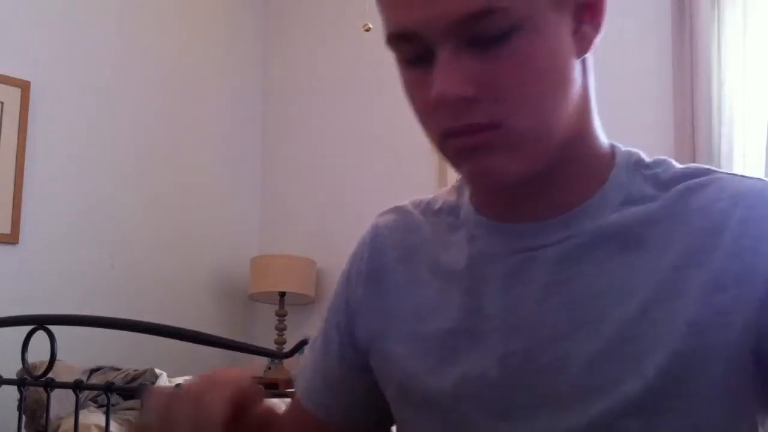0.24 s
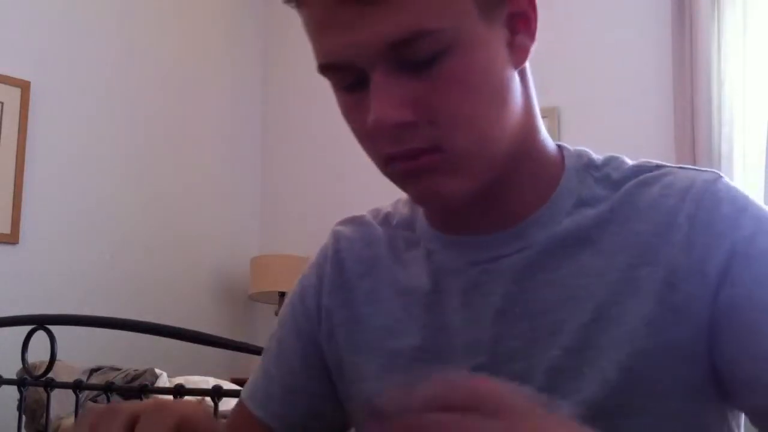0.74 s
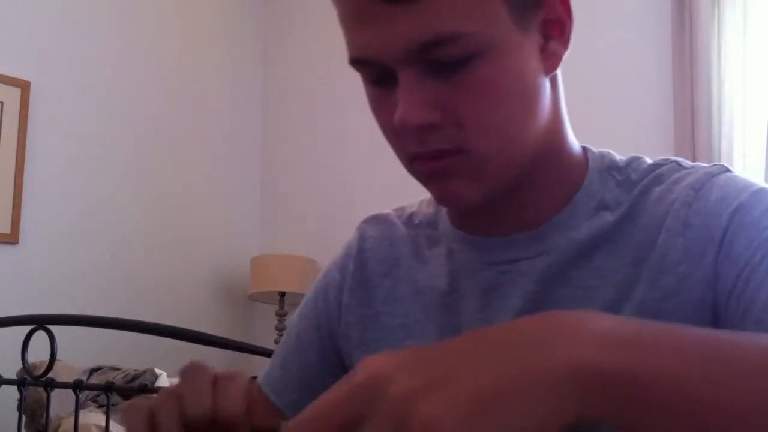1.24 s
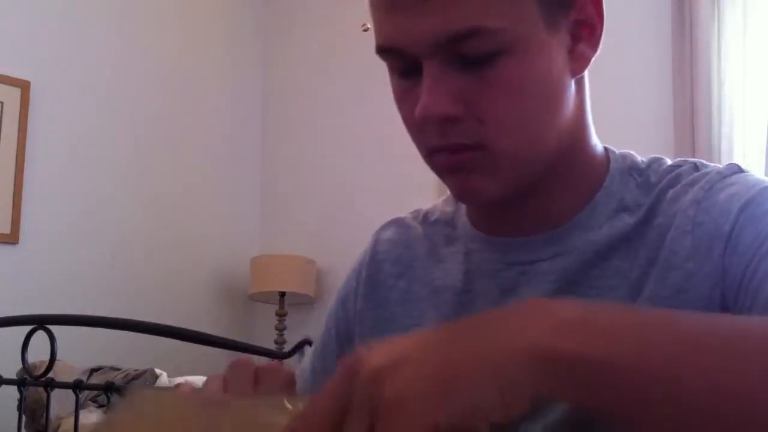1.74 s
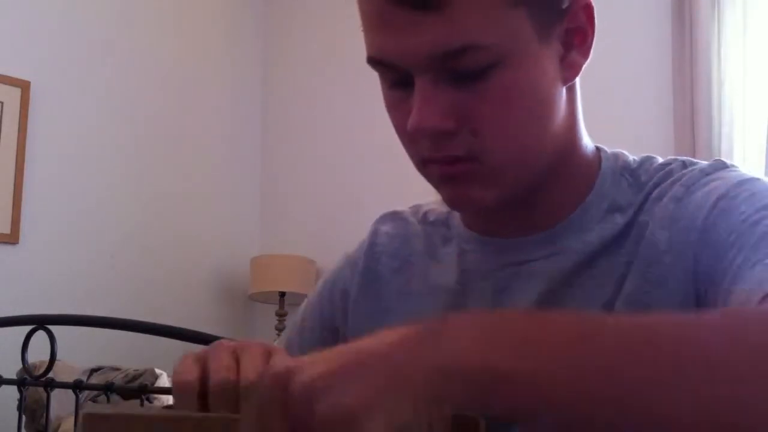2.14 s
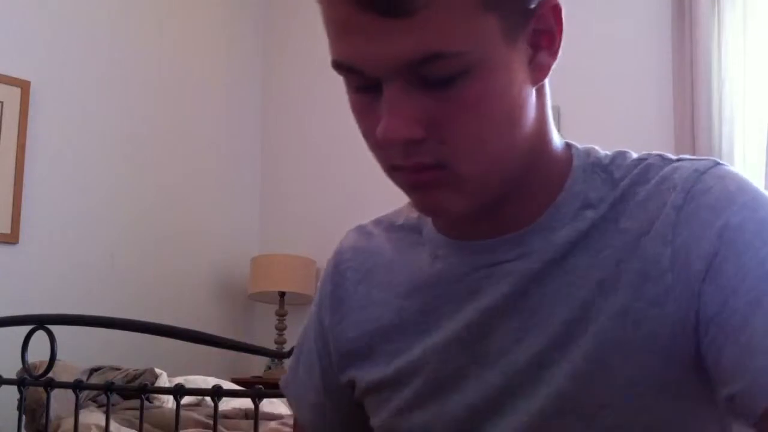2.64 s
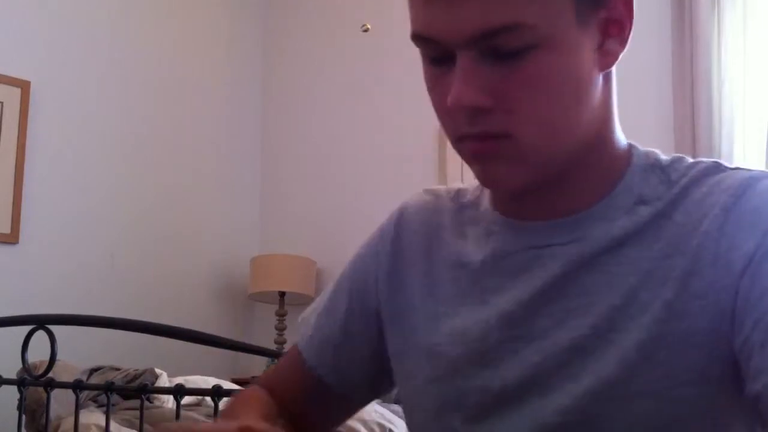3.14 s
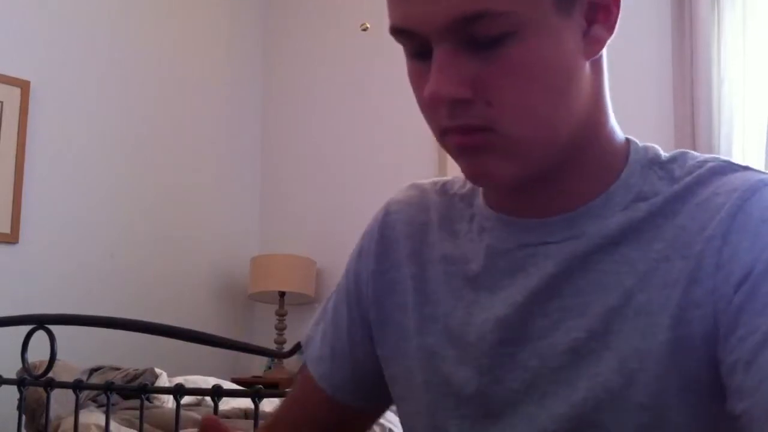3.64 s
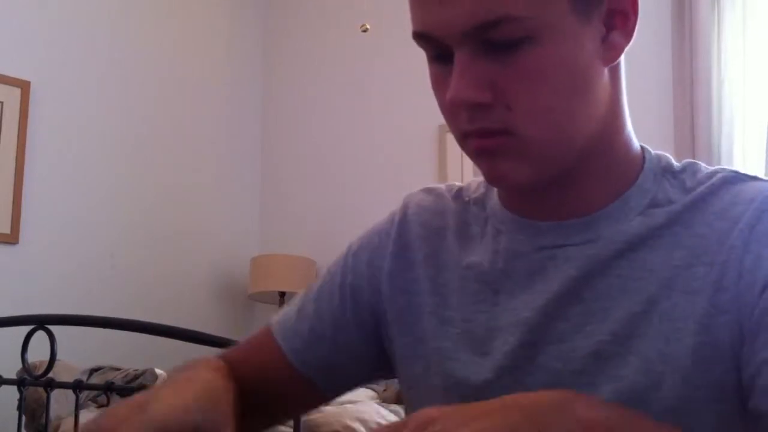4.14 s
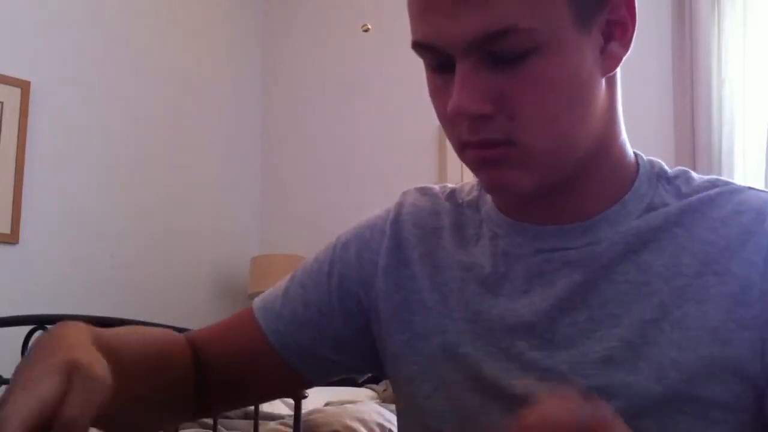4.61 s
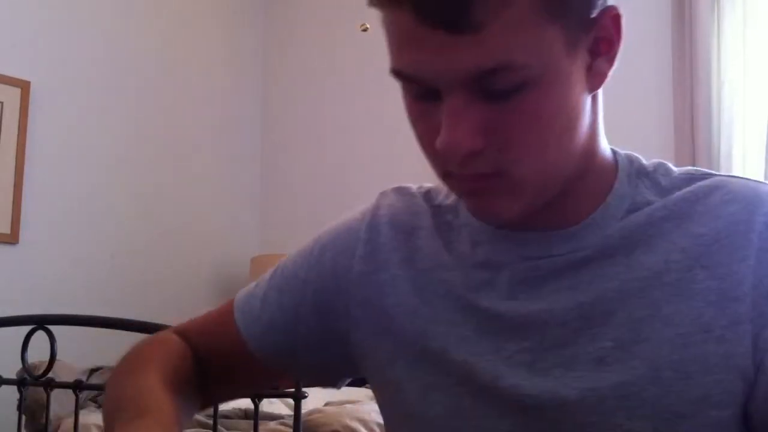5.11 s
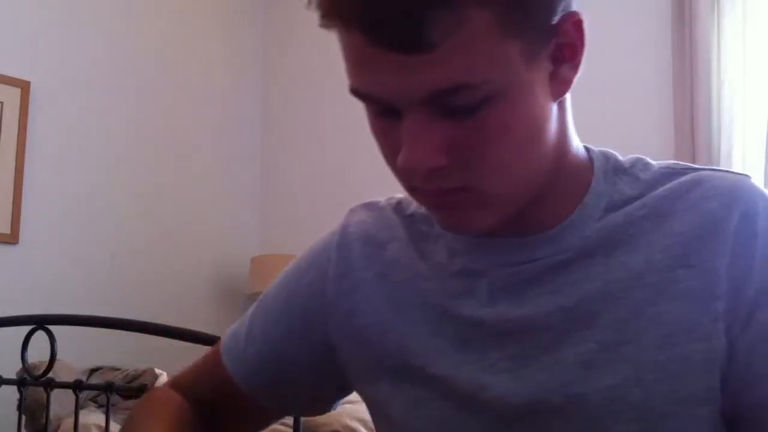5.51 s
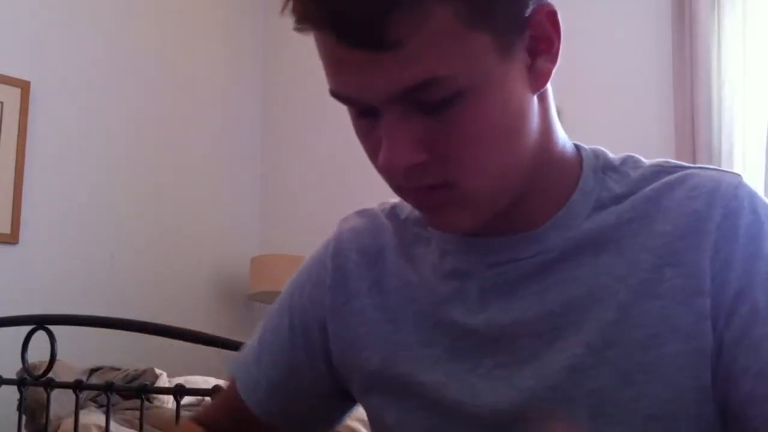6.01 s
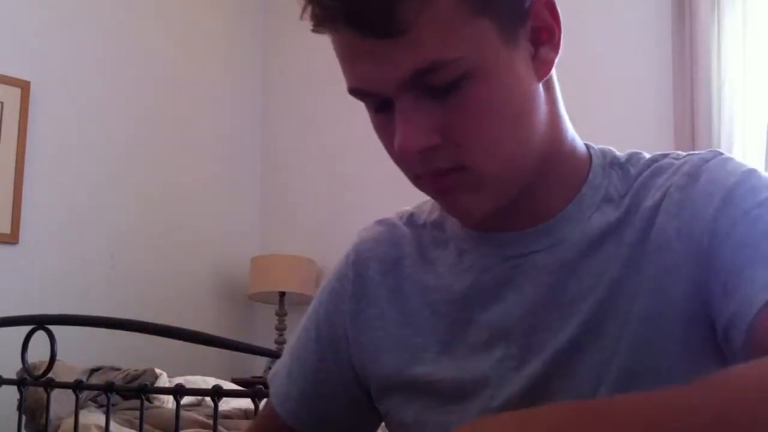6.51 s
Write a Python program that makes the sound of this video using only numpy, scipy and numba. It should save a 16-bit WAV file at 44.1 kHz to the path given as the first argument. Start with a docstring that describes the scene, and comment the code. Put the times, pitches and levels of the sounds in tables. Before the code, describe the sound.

Low room noise with a soft fan-like hum. A small metal tool clinks, then something hard snaps down twice, briefly ringing the desktop. Afterwards, much quieter plastic wrapping rustles and crackles in irregular flurries, with dry clicks, little scrapes and dull box thumps, sparser in the middle and busier towards the end. Close, slightly thin laptop microphone sound with a short, soft bedroom echo.

```python
"""Low room noise and a hum, faint ticks of plastic, a metal clink, then something hard snaps down twice on a desk.
Hands then open a plastic-wrapped box in a small bedroom, close to a laptop microphone: the wrapping rasps, hisses
(stick-slip clicks), ticks (resonant noise bursts) and crackles (dense flips); the box bumps (decaying sines) and drags.
Snaps are noise cracks plus desk modes, the clink is high modes, the room is a decaying noise echo."""
import sys
import numpy as np
from scipy import signal
from scipy.fft import rfft, irfft
from scipy.io import wavfile
from scipy.ndimage import uniform_filter1d
from numba import njit

SR = 44100
rng = np.random.default_rng(int(sys.argv[2]) if len(sys.argv) > 2 else 0)


def master(y):
    """Save y as 16-bit WAV."""
    cut = np.clip(np.atleast_2d(y).T, -1, 1)
    pcm = np.round(cut * 32767)  # scale
    wavfile.write(sys.argv[1], SR, pcm.astype(np.int16))


N = 298116
TIME = np.arange(N) / SR
RING = TIME[:SR // 2]  # time axis of one blow, s


def undb(db):
    """Decibels to gain."""
    return 10 ** (np.asarray(db) / 20)


def unit(x):
    """Scale to rms 1."""
    return x / np.sqrt(np.mean(x ** 2))


def hit_level(x, db, size=220):
    """Scale a blow so that the rms of its first samples has the given level."""
    return x * undb(db) / np.sqrt(np.mean(x[:size] ** 2))


def add(track, start_s, x):
    """Mix a sound into a track at a time."""
    i = max(int(start_s * SR), 0)
    track[i:i + len(x)] += x[:max(N - i, 0)]


def on_log_axis(hz, points):
    """Read (Hz, value) points on a log-frequency axis."""
    point_hz, value = np.transpose(points)
    return np.interp(np.log(hz + 1), np.log(point_hz), value)


def colour(x, points, extra_db=lambda hz: 0, size=4096):
    """Causal minimum-phase filter with the given spectrum plus an extra curve in dB."""
    hz = np.fft.rfftfreq(size, 1 / SR) + 1
    cepstrum = irfft(np.log(undb(on_log_axis(hz, points) + extra_db(hz))))
    # fold the cepstrum onto positive time
    cepstrum[1:size // 2] *= 2
    cepstrum[size // 2 + 1:] = 0
    response = irfft(np.exp(rfft(cepstrum)))
    return signal.fftconvolve(x, response)[:len(x)]


def fade(t60_s):
    """Exponential decay by 60 dB in t60_s."""
    return np.exp(-np.log(1000) * RING / max(t60_s, 1 / SR))


def ring(modes):
    """Sum of damped modes, each starting at a random phase."""
    return sum(undb(db) * fade(t60_s) * np.sin(2 * np.pi * (hz * RING + rng.random()))
               for hz, db, t60_s in modes)


def crack(t60_s, edge):
    """One sharp contact, then a fading noise chatter of tiny ones."""
    x = rng.standard_normal(len(RING)) * fade(t60_s)
    x[0] += edge
    return x


def walk(rate_hz):
    """Smooth random wandering, rms 1."""
    step = max(int(SR / rate_hz), 2)
    levels = np.repeat(rng.standard_normal(N // step + 1), step)
    return unit(uniform_filter1d(levels, step)[:N])


def slips(rate_hz, spread_db, flutter_db, flutter_hz):
    """Stick-slip friction: tiny clicks of random size and sign that come in flurries."""
    sizes = undb(spread_db * np.minimum(rng.exponential(size=N), 5))
    clicks = (rng.random(N) < rate_hz / SR) * sizes * rng.choice([-1, 1], N)
    return clicks * undb(flutter_db * walk(flutter_hz))


@njit
def resonance(x, hz, width):
    """State-variable band-pass with a moving centre and a width relative to it."""
    y, band, low = np.empty(len(x)), 0., 0.
    for i in range(len(x)):
        g = np.tan(np.pi * hz[i] / SR)
        v = (band + g * (x[i] - low)) / (1 + g * (g + width))
        band, low, y[i] = 2 * v - band, low + 2 * g * v, width * v
    return y


def patch(hz, patch_hz, treble_db, peak_db, octaves, treble_hz=4500):
    """Response in dB of a flexing patch of plastic: one resonance and a treble shelf."""
    peak = peak_db / (1 + (np.log2(hz / patch_hz) / octaves) ** 2)
    shelf = treble_db / (1 + (treble_hz / hz) ** 4)
    return peak + shelf


RUB_RISE_SHARE, RUB_ROUNDNESS = 0.59, 1.05  # share spent speeding up; 1 = pointed, 2 = bell-shaped


def rub(peak_s, length_s):
    """A finger speeds up, then slows a little more quickly; length_s lies between the 1/e points."""
    rise = np.clip(RUB_RISE_SHARE, .1, .9)
    away = np.where(TIME < peak_s, (peak_s - TIME) / rise, (TIME - peak_s) / (1 - rise)) / length_s
    return np.exp(-np.minimum(away, 5) ** RUB_ROUNDNESS)


def stroke(length_s, taper):
    """A movement that starts, holds its speed and stops; taper is the share spent on both ends."""
    return signal.windows.tukey(int(length_s * SR), taper)


# Light rustle, one curve per hold of the wrapping. Each row: time in seconds, level in dB before the hold offsets.
HOLD_CURVES = [
    [(0.88, -55), (1.086, -55), (1.192, -57.5), (1.25, -62)],
    [(1.47, -64.5), (1.76, -54.5)],
    [(1.82, -55), (2.31, -54.5), (3.21, -54), (3.33, -61), (4.07, -62.5)],
    [(4.33, -65), (4.81, -54.5), (6.4, -56.5), (6.51, -52), (6.76, -54.5)],
]
# Finger rubs. Each row: fastest moment in seconds, length in seconds, rasp in dB, film hiss over rasp in dB.
RUBS = [(0.98, 0.04, -47, -1), (1.028, 0.073, -49.5, -1.5), (1.209, 0.063, -53, -6),
        (1.363, 0.084, -63.5, -0.5), (1.504, 0.047, -56, 0), (1.671, 0.055, -49.5, 5.5),
        (1.905, .11, -55.5, 6), (1.993, 0.037, -57, 8.5), (2.083, 0.075, -50, -4), (2.142, 0.057, -52, 0),
        (2.226, 0.027, -44.5, -6), (2.255, 0.042, -50.5, 7.5), (2.516, 0.15, -54.5, -3),
        (2.63, 0.078, -48, 0.5), (2.987, 0.041, -48.5, 5.5), (3.077, .07, -47, 2), (3.123, 0.046, -42.5, 3),
        (3.222, 0.076, -53.5, 0.5), (3.318, 0.072, -50, 1.5), (3.825, 0.021, -53, 2),
        (3.966, 0.13, -56.5, 1), (4.041, 0.043, -57, -8.5), (4.456, 0.063, -60, 4), (4.498, 0.062, -56, 1),
        (4.663, 0.13, -53.5, -1), (4.757, 0.068, -50, 5), (4.872, 0.071, -47.5, 3), (4.982, 0.19, -52.5, 3),
        (5.105, 0.046, -60, 9.5), (5.433, 0.15, -56.5, 6.5), (5.522, 0.14, -46.5, -8),
        (5.65, .05, -57.5, 5), (5.852, 0.071, -49.5, -4), (5.99, 0.083, -53, -7), (6.062, 0.21, -53, -2.5),
        (6.155, 0.061, -56, 0), (6.216, 0.039, -61, 8.5), (6.342, 0.0097, -46, 7.5), (6.445, 0.04, -49, 1),
        (6.546, 0.071, -41.5, -2.5), (6.76, 0.078, -45, -3.5)]
# Pushes of the box over the desk. Each row: start in seconds, length in seconds, drag level in dB.
PUSHES = [(0.975, 0.046, -42.5), (1.59, 0.066, -53), (1.84, .08, -52), (2.448, 0.22, -42.5),
          (2.903, .07, -50), (3.036, .19, -49), (3.855, 0.042, -48), (4.473, 0.067, -53.5),
          (4.623, 0.063, -51), (4.82, 0.1, -49.5), (5.015, 0.052, -52), (5.11, 0.34, -51),
          (5.49, .17, -50.5), (5.8, 0.061, -49), (5.972, .15, -51), (6.342, 0.11, -51.5), (6.51, 0.14, -51)]
HOLD_RASP_DB, HOLD_HISS_DB, LET_GO_S = -3, -6.5, 0.048  # LET_GO_S: time to take hold or let go
PUSH_TAPER, DRAG_BELOW_RASP_DB = 0.57, -4.5  # all rubbing and holding also shifts the box a little


def handling():
    """Strength of drag, rasp and hiss over time: holding, rubbing and pushing add up in power."""
    hold = sum(undb(np.interp(TIME, *np.transpose(curve), left=-120, right=-120)) for curve in HOLD_CURVES)
    hold = uniform_filter1d(hold, int(LET_GO_S * SR))
    rasp = (hold * undb(HOLD_RASP_DB)) ** 2
    hiss = (hold * undb(HOLD_HISS_DB)) ** 2
    for peak_s, length_s, db, film_db in RUBS:
        power = (rub(peak_s, length_s) * undb(db)) ** 2
        rasp = rasp + power
        hiss = hiss + power * undb(film_db) ** 2
    drag = rasp * undb(DRAG_BELOW_RASP_DB) ** 2
    for start_s, length_s, db in PUSHES:
        add(drag, start_s, (stroke(length_s, PUSH_TAPER) * undb(db)) ** 2)
    return np.sqrt([drag, rasp, hiss])


# Spectrum of box on desk. Each row: frequency in Hz, relative density in dB.
DRAG_COLOUR = [(50, -23), (100, -24), (160, 0.5), (270, 0.5), (400, -5.5), (580, -5), (800, -24),
               (1500, -16.5), (4000, -58.5)]
# Spectrum of rubbed wrapping. Each row: frequency in Hz, relative density in dB.
RASP_COLOUR = [(300, -26), (600, 6.5), (810, -4), (1000, 2), (1600, -6), (2200, -4.5), (3100, -1),
               (3600, -6.5), (4100, -3.5), (5200, -4.5), (7000, -5), (16000, -47)]
# Spectrum of thin film and light contact. Each row: frequency in Hz, relative density in dB.
HISS_COLOUR = [(1500, -15.5), (4000, -10), (6500, -3), (8500, 1), (10000, 2.5), (12500, 1), (14500, -2.5),
               (16000, -5)]


def sliding(drag_gain, rasp_gain, hiss_gain, rasp_hz=1900, wander_octaves=0.21, rasp_width=0.33, focus_db=-6):
    """Friction in three places: the box drags on the desk, the wrapping rasps, its thin film hisses."""
    drag = unit(colour(slips(1500, 1.7, 4.0, 45), DRAG_COLOUR))
    crinkle = slips(4000, 1.0, 2.0, 70)
    rasp = unit(colour(crinkle, RASP_COLOUR))
    # the stretch of wrapping under the fingers changes, and its resonance with it
    centre_hz = np.clip(rasp_hz * 2 ** (wander_octaves * walk(14)), 600, 6000)
    focus = unit(resonance(rasp, centre_hz, float(rasp_width)))
    rasp = unit(rasp + undb(focus_db) * focus)
    film = unit(crinkle) + unit(slips(16000, 0.6, 2.06, 40))
    hiss = unit(colour(film, HISS_COLOUR))
    return drag * drag_gain + rasp * rasp_gain + hiss * hiss_gain


# Buckling plastic. Each row: start in seconds, level in dB before the box, patch pitch in Hz, treble shelf in dB.
TICKS = [(0.155, -56, 860, -22), (0.245, -58.5, 1000, -10), (0.375, -46, 1103, -29.5),
         (0.405, -43.5, 950, -25), (1.021, -39.5, 2060, 3), (1.168, -36.5, 3040, -8), (1.468, -45, 3130, 6),
         (1.578, -38.5, 1480, -9.5), (2.074, -40, 2720, -8), (2.098, -39.5, 1700, 4),
         (2.129, -41, 2780, -1), (2.214, -52, 2800, -1), (2.324, -48.5, 720, -27), (2.378, -42.5, 1050, -8),
         (2.416, -40.5, 2400, -8), (2.432, -34.5, 2530, 0), (2.872, -36, 1030, -57),
         (2.876, -41, 2400, -38), (3.488, -43, 2710, 0), (3.645, -43, 2480, 0.5), (3.805, -47.5, 2390, -1),
         (3.822, -41.5, 1190, -9.5), (4.299, -56, 1710, 1), (4.332, -50, 1640, 1), (4.675, -48, 2080, -35),
         (4.837, -42.5, 2130, -24), (4.902, -43, 2190, -16), (5.019, -48, 2440, -15),
         (5.127, -41, 2050, -19), (5.825, -47, 1100, -13), (5.866, -40.5, 3320, 9), (6.135, -41.5, 2140, 2),
         (6.331, -34, 1140, -17.5), (6.342, -38, 2140, -13), (6.360, -36.5, 869, -35),
         (6.439, -38, 3000, 4), (6.539, -37, 2900, -7), (6.677, -51, 2000, 2)]
# Spectrum of stiff plastic. Each row: frequency in Hz, relative density in dB.
TICK_COLOUR = [(100, -6.5), (500, 1.5), (1000, 1), (3000, 1), (4000, 1), (6000, -0.5), (8000, 0),
               (11000, 1), (16000, -4.5)]


def ticks(t60_s=0.04, buckle_s=0.00022, patch_db=9, patch_octaves=0.24):
    """Patches of stiff plastic buckle in a quick noise burst, each with its own short resonance."""
    out = np.zeros(N)
    for start_s, db, patch_hz, treble_db in TICKS:
        burst = crack(t60_s, 0) * (1 - np.exp(-RING / buckle_s))
        flex = lambda hz: patch(hz, patch_hz, treble_db, patch_db, patch_octaves)
        add(out, start_s, hit_level(colour(burst, TICK_COLOUR, flex), db))
    return out


def crinkles(rasp_gain, rate_hz=120, spread_db=2.5, below_rasp_db=-8, crease_t60_s=0.012):
    """Many small creases flip in a dense, mild crackle, louder the harder the wrapping is rubbed."""
    flips = signal.fftconvolve(slips(rate_hz, spread_db, 1.9, 5.9), crack(crease_t60_s, 2.1))[:N]
    return unit(colour(flips, TICK_COLOUR)) * rasp_gain * undb(below_rasp_db)


# Edge over wrapping. Each row: start in seconds, length in seconds, level in dB before the box,
# patch pitch in Hz, treble shelf in dB.
SCRAPES = [(1.645, 0.06, -54, 1160, -5), (2.211, 0.047, -48.5, 3420, -16), (2.953, 0.14, -50, 2260, 0),
           (3.107, 0.017, -42.5, 2600, 4), (3.816, 0.045, -49.5, 2000, -22), (4.84, 0.065, -51, 2120, 3),
           (5.119, 0.015, -49.5, 2280, 1), (5.364, 0.45, -57, 1260, -8), (5.49, 0.15, -55, 1730, -21),
           (5.5, 0.17, -57, 5160, -21), (5.819, .022, -47.5, 1110, -10), (6.365, 0.18, -50.5, 596, -27),
           (6.527, 0.01, -39.5, 4330, -4), (6.536, 0.012, -36, 2140, -19), (6.537, 0.02, -42, 1070, -19)]


def scrapes(patch_db=16, patch_octaves=0.22, taper=0.26):
    """An edge slips over the plastic in a run of tiny catches that ring one patch."""
    out, catches = np.zeros(N), slips(3000, 3.0, 1.04, 120)
    for start_s, length_s, db, patch_hz, treble_db in SCRAPES:
        count = int(length_s * SR)
        speed = np.pad(stroke(length_s, taper), (0, len(RING) - count))
        run = speed * np.roll(catches, -int(start_s * SR))[:len(RING)]
        flex = lambda hz: patch(hz, patch_hz, treble_db, patch_db, patch_octaves)
        add(out, start_s, hit_level(colour(run, TICK_COLOUR, flex), db, size=count))
    return out


# Box and hands on the desk. Each row: start in seconds, level in dB before the box resonances, pitch in Hz.
BUMPS = [(0.372, -46, 215), (0.973, -34, 245), (1.016, -36.5, 174), (1.304, -45.5, 275), (1.471, -43, 203),
         (1.575, -37.5, 277), (1.979, -46, 322), (2.115, -41.5, 176), (2.259, -42, 266),
         (2.324, -38.5, 254), (2.382, -40.5, 232), (2.481, -41.5, 277), (2.591, -41.5, 403),
         (2.875, -41, 618), (3.135, -36.5, 300), (3.704, -46, 190), (4.826, -41.5, 268), (5.017, -41, 293),
         (5.128, -34.5, 326), (5.349, -47, 428), (6.33, -29, 257), (6.358, -35.5, 600), (6.488, -41.5, 597)]


def bumps(t60_s=0.05, push_s=0.00092, rattle_db=-5):
    """Soft blows: the hollow box booms briefly as a decaying sine and shudders on the desk."""
    out = np.zeros(N)
    for start_s, db, hz in BUMPS:
        boom = np.sin(2 * np.pi * hz * RING) * fade(t60_s) * (1 - np.exp(-RING / push_s))
        shudder = colour(crack(t60_s, 1.9), DRAG_COLOUR)
        blow = hit_level(boom, 0, size=660) + hit_level(shudder, rattle_db, size=660)
        add(out, start_s, hit_level(blow, db, size=440))
    return out


# Resonances of the hollow box. Each row: frequency in Hz, width in Hz, lift in dB.
BOX_MODES = [(250, 12, 1.5), (402, 15, 8.5), (579, 70, 4.5), (760, 18, 8), (918, 36, 6), (1037, 56, 2),
             (1340, 19, 3), (1480, 41, 3.5), (2130, 43, 1.5), (2600, 130, 1.5), (3130, 140, 1.5)]


def box(x):
    """The walls and the air of the box lift whatever touches it at their resonances."""
    return x + sum((undb(db) - 1) * signal.lfilter(*signal.iirpeak(hz, hz / width_hz, fs=SR), x)
                   for hz, width_hz, db in BOX_MODES)


# Hard contacts of two snaps. Each row: start in seconds, crack level in dB, bass shelf in dB,
# treble shelf in dB, crack t60 in seconds.
SNAPS = [(0.5369, -16.5, 3, 0, 0.026), (0.5396, -15.5, 8.5, 3.5, 0.036), (0.546, -32, -6, -19, 0.018),
         (0.587, -45, 38, -9, 0.019), (0.689, -39, 9, -76, 0.16), (0.7005, -13, -2.5, -4.5, 0.033),
         (0.7038, -16.5, 1, 3, 0.0071), (0.714, -38, 5.5, -31, 0.0098), (0.7255, -24, 6.5, -26, 0.045),
         (0.812, -44, 0, -27, 0.05)]
# Modes of the desk top. Each row: frequency in Hz, relative level in dB, t60 in seconds.
DESK_MODES = [(243, -1, .22), (285, -4, .22), (412, -3, .28), (595, -8, .18), (775, -8, .18),
              (892, -1, .16), (976, -2, .12), (1054, -1, .12), (1093, -1, .16), (1418, 1, .16),
              (1453, 1, .15), (1511, -2, .19), (1674, -2, .17), (1824, -5, .15), (1921, -3, .15),
              (2170, -3, .15), (2658, -6, .17), (2918, -8, .15), (4010, -13, .17), (5803, -11, .18)]
# Spectrum of a crack. Each row: frequency in Hz, relative density in dB.
SNAP_COLOUR = [(40, -14), (120, -28.5), (230, 0.5), (400, -17.5), (700, -5.5), (1050, 0.5), (1500, -2),
               (2000, -5.5), (3000, -7.5), (4000, -13.5), (7000, -15), (10000, -13.5), (13000, -18),
               (16000, -23)]


def snaps(edge=4, desk_db=-13.5, desk_bass_hz=420, treble_hz=4000):
    """Hard contacts crack and set the desk top ringing; returns the cracks and the ring."""
    cracks, desk = np.zeros(N), np.zeros(N)
    for start_s, db, bass_db, treble_db, t60_s in SNAPS:
        tilt = lambda hz: bass_db / (1 + (hz / desk_bass_hz) ** 4) + treble_db / (1 + (treble_hz / hz) ** 4)
        modes = [(hz, mode_db + tilt(hz), mode_t60_s) for hz, mode_db, mode_t60_s in DESK_MODES]
        add(cracks, start_s, hit_level(colour(crack(t60_s, edge), SNAP_COLOUR, tilt), db))
        add(desk, start_s, hit_level(ring(modes), db + desk_db, size=880))
    return cracks, desk


# Touches of the metal tool. Each row: start in seconds, ring level in dB.
CLINKS = [(0.383, -52), (0.3863, -34.5)]
# Modes of the tool. Each row: frequency in Hz, relative level in dB, t60 in seconds.
TOOL_MODES = [(7900, -8, .04), (8150, -15, .03), (8260, -11, .04), (10800, -11, .02), (11600, -6, .016),
              (12800, -3, 0.033), (12700, 4, .014), (15100, -8, .01)]


def clinks(contact_db=-5, contact_t60_s=0.005):
    """A small metal tool touches the desk with a short noise contact and rings high."""
    out = np.zeros(N)
    for start_s, db in CLINKS:
        contact = colour(crack(contact_t60_s, 1.2), HISS_COLOUR)
        add(out, start_s, hit_level(ring(TOOL_MODES), db) + hit_level(contact, db + contact_db))
    return out


# Decay of the room. Each row: frequency in Hz, t60 in seconds.
ROOM_T60 = [(150, 0.29), (1000, 0.26), (4000, 0.28), (16000, 0.22)]


def bedroom(first_echo_s=0.0034, build_s=0.0017, treble_loss_db=-2, soft_hz=2500):
    """Diffuse echo of a furnished room, noise decaying per octave; bedding and curtains soften the treble."""
    hz = np.fft.rfftfreq(len(RING), 1 / SR)
    noise = rfft(rng.standard_normal(len(RING))) * undb(treble_loss_db * hz ** 2 / (hz ** 2 + soft_hz ** 2))
    octave = np.clip(np.round(np.log2(hz + 1)), 7, 14)
    tail = sum(irfft(noise * (octave == k), len(RING)) * fade(on_log_axis(2 ** k, ROOM_T60))
               for k in np.unique(octave))
    tail = tail * (1 - np.exp(-np.maximum(RING - first_echo_s, 0) / build_s))
    return tail / np.sqrt(np.sum(tail ** 2))


# Spectrum of the room noise. Each row: frequency in Hz, relative density in dB.
QUIET_COLOUR = [(30, -16), (70, -21.5), (95, -44), (125, -1), (200, 2), (400, -2.5), (650, -13.5),
                (1200, -15), (2200, -26), (5000, -30), (16000, -34.5)]
QUIET_DB, HUM_HZ, HUM_DB = -55.5, 114.3, -67.5  # levels before the slow wavering


def quiet(waver_db=2.0):
    """Low room noise with the wavering hum of a fan."""
    noise = unit(colour(rng.standard_normal(N), QUIET_COLOUR))
    air = noise * undb(QUIET_DB + 0.91 * walk(2.144))
    hum = np.sqrt(2) * np.sin(2 * np.pi * HUM_HZ * TIME)
    return air + hum * undb(HUM_DB + waver_db * walk(2.2))


def scene(snap_room_db=-7, tick_room_db=-10, clink_room_db=-15, slide_room_db=-8):
    """All sources on the desk, each with its share of the room."""
    cracks, desk = snaps()
    drag, rasp, hiss = handling()
    sources = [(cracks, snap_room_db), (clinks(), clink_room_db),
               (box(ticks() + bumps() + crinkles(rasp)), tick_room_db),
               (box(sliding(drag, rasp, hiss) + scrapes()), slide_room_db)]
    # the desk's ring is added dry, without room echo
    direct = desk + sum(x for x, _ in sources)
    send = sum(x * undb(room_db) for x, room_db in sources)
    echo = signal.fftconvolve(send, bedroom())[:N]
    return (direct + echo + quiet())[None]


def record(dry, low_cut_hz=100, top_hz=15850):
    """The laptop microphone thins the bass and rounds the peaks; the sound ends steeply near 15.85 kHz."""
    thin = signal.sosfilt(signal.butter(2, low_cut_hz, "high", fs=SR, output="sos"), dry)
    rounded = np.tanh(thin)
    return signal.sosfilt(signal.ellip(12, .1, 75, top_hz, fs=SR, output="sos"), rounded)


dry = scene()
out = record(dry)
master(out)
```